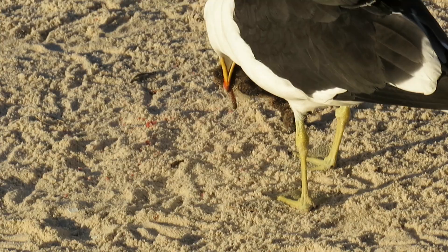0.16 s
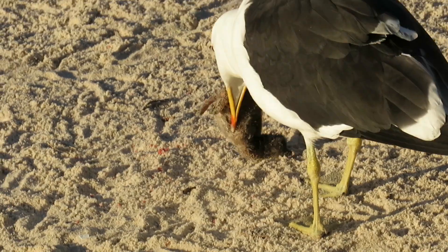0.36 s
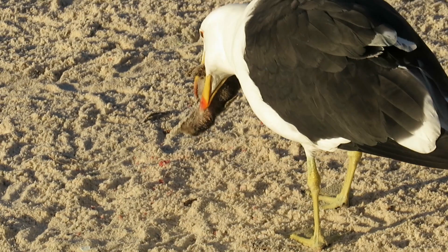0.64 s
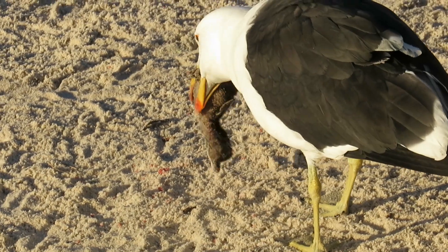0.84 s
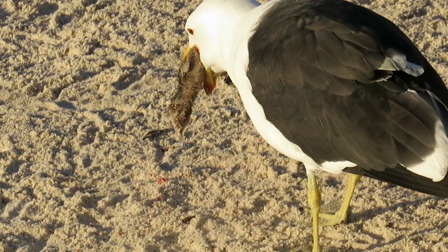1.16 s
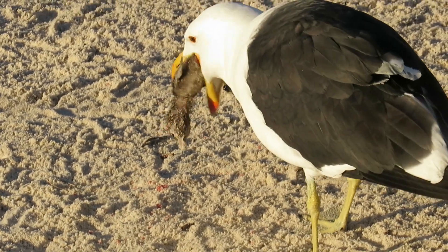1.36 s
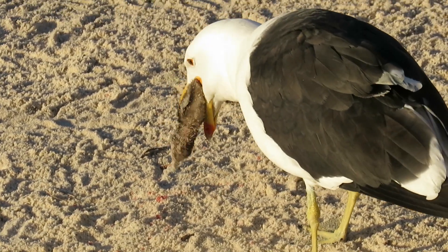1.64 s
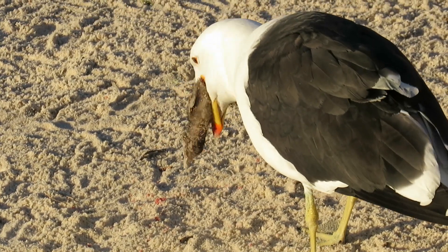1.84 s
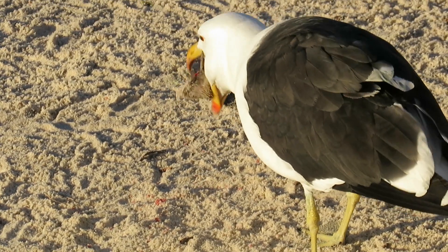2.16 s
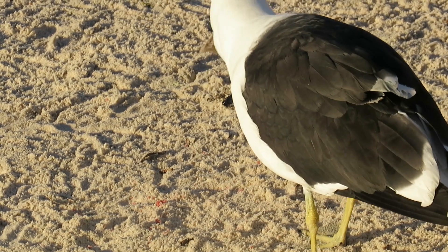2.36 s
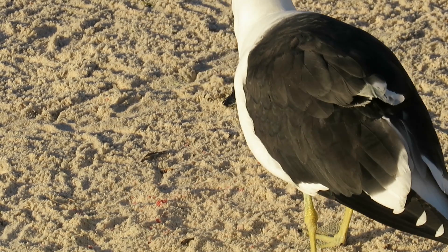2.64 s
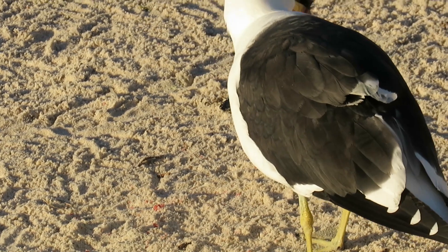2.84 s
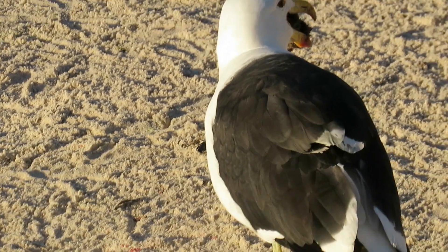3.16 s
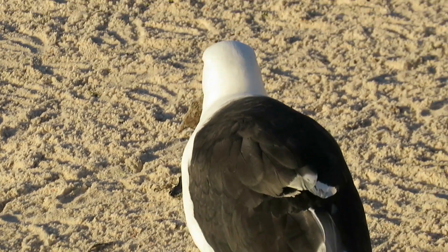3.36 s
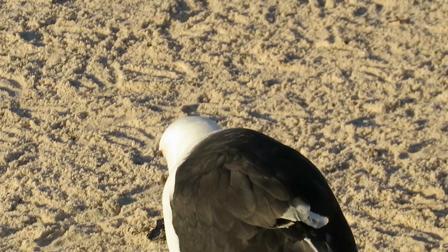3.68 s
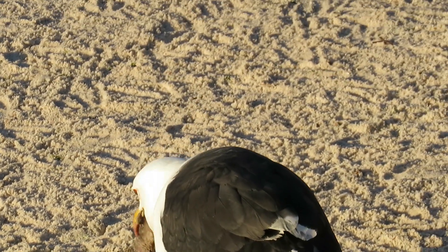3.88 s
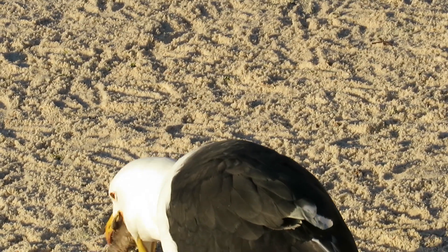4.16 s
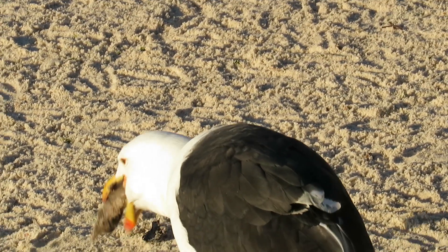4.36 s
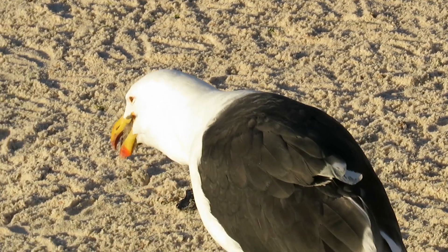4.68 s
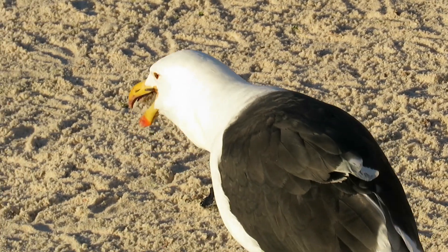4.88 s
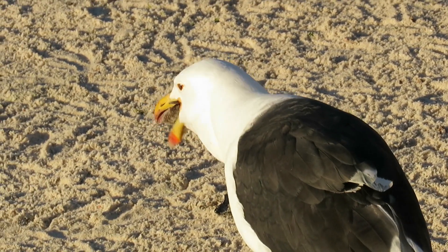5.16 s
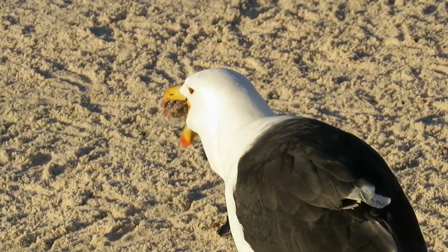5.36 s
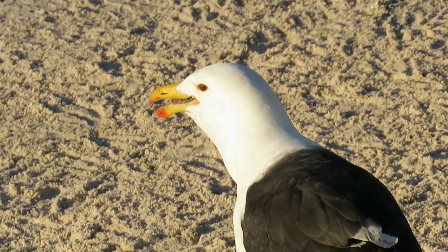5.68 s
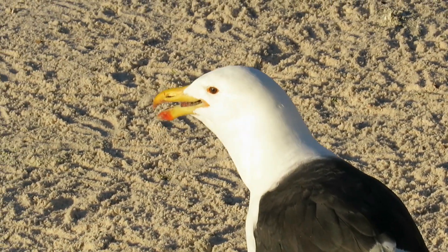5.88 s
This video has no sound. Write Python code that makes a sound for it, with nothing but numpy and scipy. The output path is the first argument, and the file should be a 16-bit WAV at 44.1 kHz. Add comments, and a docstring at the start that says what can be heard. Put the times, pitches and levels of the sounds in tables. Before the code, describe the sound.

A sandy beach heard in narrow stereo. Surf noise steps up abruptly at about 0.24 s, swells from 0.8 to 1.15 s, holds, and drains away after 2.2 s over a faint low hum. From 0.2 to 2.3 s a rattling penguin brays, rough and pulsing about 32 times a second, rising to a clearer, louder peak near 2.1 s. A lower penguin crosses it at 1.2-1.9 s with two calls settling into smooth notes. A faint tick and single high chirp come near 0.8 s; chirps resume at 2.4 s, roughly every 0.3 s. Second long brays overlap: low from 2.4 and 3.25 s, rattling from 2.75 to 4.4 s. Falling gull mews sound on the right at 2.65, 3.3 and 4.65 s, the latter two doubled. From 4.7 s to the end come short hoarse brays, with a soft low thud at 5.6 s.

```python
"""A sandy beach, heard at a camera's two closely spaced microphone ports.
A high, rattling penguin brays; the surf noise steps up abruptly, then swells and drains away over a faint hum.
A small bird gives one chirp, a low, smooth penguin brays across the first, and chirps resume at a steady pace.
Gulls, falling whistles with a strong octave, mew three times, and short brays close the scene.
Each bray is a tone chopped by an uneven rattle, with overtones coloured by the throat."""
import sys
import numpy as np
from scipy import signal
from scipy.fft import rfft, irfft, next_fast_len
from scipy.io import wavfile
from scipy.ndimage import uniform_filter1d, map_coordinates

SR = 44100
rng = np.random.default_rng(int(sys.argv[2]) if len(sys.argv) > 2 else 0)


def persist_wave(psi):
    """Save psi, clipped to +-1, as 16-bit WAV."""
    counts = np.round(np.clip(psi, -1, 1) * 32767).astype(np.int16)
    wavfile.write(sys.argv[1], SR, np.atleast_2d(counts).T)


N = 265482  # length [samples]

# Surf layers rumble, wash, spray, before their trims: (calm sea level [dB], gain at full strength [dB],
# held back before the step up [dB], power of the strength that the gain follows)
SURF_LAYERS = [(-49, 15.5, -0.1, 0.85), (-42.5, 14.5, 2, 0.78), (-53.5, 16, 12.5, 1.2)]
# Relative spectra of the three layers: (frequency [Hz], level per Hz [dB])
RUMBLE_SPECTRUM = [(20, -24), (55, -1), (110, 3.5), (180, 7), (500, -16.5), (1500, -72.5)]
WASH_SPECTRUM = [(100, -20), (230, 10.5), (520, -0.5), (800, 2), (1600, -10), (2400, -18.5), (4500, -55.5)]
SPRAY_SPECTRUM = [(600, -23.5), (1400, 6.5), (2200, 4), (2750, 0), (3600, -1.5), (7000, -14), (10000, -25),
                  (15000, -89)]
# Likeness of the surf at the two ports: (frequency [Hz], left-right likeness [0-1])
SURF_LIKENESS = [(300, 1), (1100, .96), (2300, .88), (7300, .69)]
# The surf's lean to the left: (frequency [Hz], left minus right [dB])
SURF_LEAN = [(370, 0.5), (2300, 4.2), (4300, 2.4), (14000, 0)]
# Relative spectrum of the camera's own noise: (frequency [Hz], level per Hz [dB])
HISS_SPECTRUM = [(3000, 8), (10000, 8.5), (13000, -5)]
# Soft low bumps: (time [s], half length [s], frequency [Hz], level [dB])
LOW_BUMPS = [(.218, .025, 105, -31), (5.635, .05, 55, -40)]
# Faint, brief peeps: (time [s], half length [s], frequency [Hz], level [dB])
FAINT_PEEPS = [(.068, .012, 1650, -41), (.135, .016, 1680, -41)]
# The small bird's chirps: (start [s], peak level [dB], lift of the opening flick [dB])
BIRD_CHIRPS = [(.775, -46, -4), (2.39, -44, -4), (2.706, -39, -8), (3.018, -38.5, 2), (3.64, -40, -1),
               (3.939, -42.5, 3), (4.245, -42, 5), (4.564, -42.5, 5), (4.87, -45, 4), (5.173, -46, 7),
               (5.48, -42.5, 4), (5.779, -46, 0)]
# Shape of one chirp: (time from its start [s], pitch [Hz], level against its peak [dB])
CHIRP_SHAPE = [(0, 6200, -30), (.009, 5650, -11), (.012, 5050, -13), (.018, 4720, -20), (.034, 4530, -4),
               (.052, 4350, 0), (.062, 4300, -8), (.08, 4450, -15)]
# Gull mews, one table each, some overlapping: (time [s], pitch [Hz], fundamental level [dB],
# octave level [dB], higher overtones' level before the beak's resonance [dB])
GULL_MEWS = [
    [(2.648, 1880, -62, -50, -70), (2.668, 1845, -47, -42, -64), (2.71, 1680, -38, -43, -58),
     (2.772, 1680, -38, -43, -58), (2.795, 1690, -50, -60, -70)],
    [(3.265, 1860, -52, -60, -70), (3.29, 1785, -39, -49, -60), (3.312, 1725, -39, -48, -51),
     (3.345, 1700, -37, -49, -47), (3.368, 1615, -37, -47, -51), (3.39, 1340, -41, -48, -50),
     (3.44, 1298, -47, -47, -52), (3.495, 1262, -53, -47, -57), (3.55, 1265, -60, -55, -68)],
    [(3.272, 1190, -62, -52, -60), (3.345, 1270, -58, -45, -51), (3.38, 1105, -58, -47, -46),
     (3.403, 1095, -60, -47, -45)],
    [(4.635, 1690, -50, -60, -68), (4.66, 1670, -38, -48, -57), (4.69, 1570, -39, -53, -62),
     (4.782, 1505, -37, -52, -58), (4.792, 1480, -52, -51, -65), (4.818, 1335, -47, -52, -68),
     (4.88, 1240, -52, -53, -66), (4.958, 1205, -49, -56, -70)],
    [(4.73, 1715, -58, -54, -60), (4.803, 1490, -40, -53, -63), (4.85, 1400, -55, -63, -70)],
]
# The rattling penguin's brays, levels before the attack: (start [s], peak [s], end [s], start pitch [Hz],
# peak pitch [Hz], end pitch [Hz], start level [dB], peak level [dB], roughness at the peak [0-1],
# roughness in the tail [0-1], power of the fall, overtone lift [dB])
HIGH_PENGUIN_BRAYS = [ (.2, 2.06, 2.345, 258, 308, 290, -32.7, -26.4, .56, .6, 7, 0.5),
                      (2.75, 4.2, 4.42, 268, 303, 245, -35.5, -27.2, .64, .16, 2.2, 1.5),
                      (4.725, 4.77, 4.87, 262, 278, 160, -32, -31, .7, .5, 1.8, -3),
                      (4.98, 5.09, 5.19, 248, 264, 257, -34, -30, .8, .6, 3, -3),
                      (5.18, 5.235, 5.3, 255, 275, 225, -26, -27.5, .45, .45, 1.2, -6),
                      (5.255, 5.72, 5.83, 278, 252, 195, -33.8, -30, .45, .35, 2.4, -2.5), ]
# The smooth penguin's brays, levels before attack and sag: (start [s], settles [s], end [s],
# rattle pitch [Hz], note pitch [Hz], rattle level [dB], note level [dB], sag time [s], share of pitch lost)
LOW_PENGUIN_BRAYS = [ (1.18, 1.26, 1.47, 252, 223, -29.5, -25.3, .01, .25),
                     (1.42, 1.67, 1.93, 236, 222, -27.5, -26, .04, .25),
                     (2.42, 2.81, 3.24, 238, 212, -33, -27, .027, .25),
                     (3.25, 4.23, 4.65, 232, 210.5, -37.5, -28.9, .033, .25),
                     (4.96, 5.01, 5.28, 212, 214, -33, -32.5, .11, .6),
                     (5.4, 5.85, 6.01, 215, 204, -43.5, -34, .07, .5), ]
# The throat's colour on overtones, before effort: (frequency [Hz], level against the fundamental [dB])
THROAT_COLOUR = [(500, -2.5), (610, -8), (740, -11), (920, -2.5), (1070, -10.5), (1550, -12.5), (2200, -30)]
# The hardest jolts in the rattle: (time [s])
JOLT_TIMES = [.298, .737, 1.81, 2.037, 2.143, 2.228, 2.31, 2.503, 3.55, 4.007, 4.04, 4.102, 4.133, 4.195,
              5.062, 5.203, 5.686, 5.742]
# Hoarse air in the short strokes: (time [s], half length [s], level [dB])
HOARSE_STROKES = [(4.769, 0.032, -40.5), (5.234, .034, -38.5), (5.675, 0.045, -39)]
# That air in the throat's resonances, relative: (frequency [Hz], level per Hz [dB])
HOARSE_SPECTRUM = [(300, -18), (680, -9), (800, 2.5), (910, 2), (1050, -14), (1450, -6), (2300, -17.5),
                   (9000, -66)]

STEP_UP_S = 0.237  # the surf noise steps up abruptly
BUILD_S, CREST_S, DRAIN_S, DRAIN_TIME_S = 0.76, 1.15, 2.172, 0.78  # it builds, holds and drains away
FIRST_STRENGTH, CREST_STRENGTH = 0.71, 0.97  # surf strength before it builds and at the crest [0-1]
RUMBLE_TRIM_DB, WASH_TRIM_DB, SPRAY_TRIM_DB = 1, 1.0, 4.0
SPLASH_S, SPLASH_HALF_S, SPLASH_DB = 1.095, .03, 4  # a brief burst of spray near the crest
FOAM_PATCHY_DB = .8  # the foam is dense and even
HUM_GROWS_S, HUM_GROWS_DB = 4.7, 6  # the hum is stronger late on
TICK_S, TICK_DB, TICK_DECAY_S, TICK_TOP_HZ = .753, -38, .002, 7000  # level before the low-pass
CRACK_S = .17  # a mew's added unsteadiness per glide speed [share of pitch a second]
BRAY_ATTACK_S, BRAY_ATTACK_DB = 0.027, 10  # every bray swells in from this far below
RATTLE_HZ, RATTLE_STRAY = 32.5, 1.0  # approximate beats a second; scale of their straying [radians]
JOLT_S, JOLT_DB = .012, 1.8  # half length of a jolt; its lift at full throb depth
WIND_UP_ROUGH, CLEARING_SHARE = 1.0, .2  # first roughness; share of the wind-up over which it clears
CRESCENDO_POWER = 1.7  # bend of the climb
# The drop just after the peak (in full for a clean tail) and the further loss by the end
LET_GO_S, LET_GO_DB, FALL_DB = .03, 6.3, 10
RATTLE_ROUGH, NOTE_ROUGH, SETTLE_S = 0.52, 0.039, 0.023  # roughness before and after settling; its speed
SAG_DB = 20.5  # level lost by the end of the low note
TOP_HZ = 15100  # the camera's band limit


def amp(db):
    """Decibels to gain."""
    return 10 ** (np.asarray(db) / 20)


def unit(x):
    """Scale to rms 1."""
    return x / np.sqrt(np.mean(x ** 2) + 1e-20)


def along(points, hz):
    """(Hz, value) points read on a log frequency axis."""
    f, v = np.transpose(points)
    return np.interp(np.log(hz + 1), np.log(f + 1), v)


def ramp(t, start, end):
    """0 before the start, 1 after the end, straight between."""
    return np.clip((t - start) / max(end - start, 1e-3), 0, 1)


def switch(t, s, width_s):
    """A smooth step from 0 to 1 around time s."""
    return .5 + .5 * np.tanh((t - s) / (2 * width_s))


def bump(t, s, half_s):
    """A bell-shaped swell to 1 at time s."""
    return np.exp(-((t - s) / half_s) ** 2)


def blend(a, b, share):
    """From a to b as the share goes from 0 to 1."""
    return a + (b - a) * share


def wobble(rate, size):
    """A smooth random curve, rate knots a second."""
    at = np.arange(size) * rate / SR
    return map_coordinates(rng.standard_normal(int(at[-1]) + 4), [at], mode="mirror")


def turns(hz):
    """Running phase [radians] of a changing frequency."""
    return 2 * np.pi * np.cumsum(hz) / SR


def add(track, s, sound):
    """Mix a sound into a track from time s."""
    part = track[max(round(s * SR), 0):][:len(sound)]
    part += sound[:len(part)]


def call_clock(start, end):
    """A call's sample times and its soft-edged gate."""
    t = np.arange(start, end, 1 / SR)
    return t, np.clip(np.minimum(t - start, end - t) / 0.0061, 0, 1)


def call_curves(rows):
    """A call's gate and its columns, sample by sample over its own length."""
    s, *columns = np.transpose(rows)
    t, gate = call_clock(s[0], s[-1])
    return [gate] + [np.interp(t, s, column) for column in columns]


def blips(rows, waver):
    """Short wavering tones that swell and fade; waver scales the stray as a share of the pitch."""
    t = np.arange(N) / SR
    sway = 1 + waver * wobble(110, N)
    tones = sum(amp(db) * bump(t, s, half_s) * np.sin(turns(hz * sway)) for s, half_s, hz, db in rows)
    return np.sqrt(2) * tones


def filtered(x, response):
    """x through a complex response of frequency."""
    m = next_fast_len(N + SR // 4)
    return irfft(rfft(x, m) * response(np.fft.rfftfreq(m, 1 / SR)), m)[..., :N]


def ports(x, left_db, lead_us):
    """A source to one side is louder and earlier at the nearer port; positive values lie left."""
    side = np.array([[.5], [-.5]])
    seconds = lead_us * 1e-6
    return filtered(x, lambda hz: amp(side * left_db(hz)) * np.exp(2j * np.pi * hz * side * seconds))


def beach(x, t60=0.68):
    """Rocks and dunes return a thin, short tail, as decaying noise after a 12 ms gap."""
    t = np.arange(SR // 2) / SR
    tail = rng.standard_normal((2, len(t))) * amp(-60 * t / t60) * (t > .012)
    return signal.fftconvolve(x, tail / np.linalg.norm(tail[0]), axes=1)[:, :N]


def drone(hz=54, db=-55):
    """A faint, fuzzy low hum lies under everything, with wandering phase and level."""
    level_db = db + HUM_GROWS_DB * switch(np.arange(N) / SR, HUM_GROWS_S, width_s=.1)
    tone = np.sin(turns(np.full(N, hz)) + 0.89 * wobble(9, N))
    return amp(level_db) * unit(tone * amp(2.6 * wobble(12, N)))


def surf_levels():
    """One strength curve drives all three layers [dB]; a splash lifts the spray briefly."""
    t = np.arange(N) / SR
    strength = blend(FIRST_STRENGTH, CREST_STRENGTH, ramp(t, BUILD_S, CREST_S))
    strength *= np.exp(-np.maximum(t - DRAIN_S, 0) / DRAIN_TIME_S)
    before_step = 1 - switch(t, STEP_UP_S, width_s=0.0012)
    levels = np.array([calm_db + crest_db * strength ** power - held_db * before_step
                       for calm_db, crest_db, held_db, power in SURF_LAYERS])
    levels[-1] += SPLASH_DB * bump(t, SPLASH_S, SPLASH_HALF_S)
    return levels


def rush(spectrum, patchy_db):
    """Stereo water noise of rms 1, with patches of random gain and less likeness in the treble."""
    z = signal.stft(rng.standard_normal((2, N)), nperseg=512)[2]
    field = uniform_filter1d(rng.standard_normal(z.shape[1:]), size=5, axis=0)  # across frequency
    field = uniform_filter1d(field, size=12, axis=1)  # across time
    pair = signal.istft(z * amp(patchy_db * unit(field)), nperseg=512)[1][:, :N]

    def colour_and_spread(hz):
        angle = np.arccos(np.clip(along(SURF_LIKENESS, hz), -1, 1)) / 2
        return amp(along(spectrum, hz)) * [np.cos(angle), np.sin(angle)]

    mid, side = filtered(pair, colour_and_spread)
    return unit(np.array([mid + side, mid - side]))


def surf():
    """The water's weight rumbles, its foam washes up the sand and its spray hisses, leaning left."""
    rumble_db, wash_db, spray_db = surf_levels()
    sea = amp(rumble_db + RUMBLE_TRIM_DB) * rush(RUMBLE_SPECTRUM, patchy_db=0.5)
    sea += amp(wash_db + WASH_TRIM_DB) * rush(WASH_SPECTRUM, FOAM_PATCHY_DB)
    sea += amp(spray_db + SPRAY_TRIM_DB) * rush(SPRAY_SPECTRUM, FOAM_PATCHY_DB)
    return ports(sea, lambda hz: along(SURF_LEAN, hz), lead_us=40.7)


def low_bumps():
    """Two soft low thuds, each a wavering tone that swells and fades."""
    return blips(LOW_BUMPS, waver=.2)


def tick():
    """One faint dry tick close by: a tiny burst of noise that dies at once."""
    track, t = np.zeros(N), np.arange(SR // 50) / SR
    add(track, TICK_S, amp(TICK_DB) * np.exp(-t / TICK_DECAY_S) * rng.standard_normal(len(t)))
    return signal.sosfilt(signal.butter(2, TICK_TOP_HZ, fs=SR, output="sos"), track)


def peeps():
    """Two faint peeps at the start, each a slightly wavering tone that swells and fades."""
    return blips(FAINT_PEEPS, waver=.025)


def small_bird():
    """The same down-slurred chirp off to the right: a gliding tone of varying flick and level."""
    track = np.zeros(N)
    gate, pitch, db = call_curves(CHIRP_SHAPE)
    size = len(gate)
    t = np.arange(size) / SR
    for s, peak_db, flick_db in BIRD_CHIRPS:
        shape = gate * amp(flick_db * (1 - ramp(t, .014, .02)))
        hz = pitch * (1 + 0.0037 * rng.standard_normal() + .013 * wobble(500, size))
        add(track, s, shape * amp(db + peak_db + 1.5 * wobble(160, size)) * np.sin(turns(hz)))
    return ports(track, lambda hz: -3, lead_us=-44.0)


def mew(rows, beak_hz=4600, width_hz=1500, step_db=1.5):
    """A falling whistle with a strong octave, rough where it cracks; the open beak rings above."""
    gate, pitch, first_db, octave_db, upper_db = call_curves(rows)
    size = len(gate)
    unsteady = 1 + CRACK_S * SR * np.abs(np.gradient(np.log(pitch)))
    hz = pitch * (1 + .006 * unsteady * wobble(200, size))
    phase = turns(hz)
    voice = amp(first_db) * np.sin(phase) + amp(octave_db) * np.sin(2 * phase)
    for k in range(3, 6):
        beak = 1 / (1 + (2 * (k * hz - beak_hz) / width_hz) ** 2)
        overtone_db = upper_db - step_db * (k - 3.5) + 2.5 * wobble(90, size)
        voice += beak * amp(overtone_db) * np.sin(k * phase)
    return np.sqrt(2) * gate * voice * amp(unsteady * wobble(140, size))


def gulls():
    """Mews from the right, each gliding down with its own shrillness."""
    track = np.zeros(N)
    for rows in GULL_MEWS:
        add(track, rows[0][0], mew(rows))
    return ports(track, lambda hz: -5, lead_us=-33)


def hoarse_air(flutter_db=4.5):
    """Fluttering noise: air rasps through the penguin's throat at the height of short strokes."""
    t = np.arange(N) / SR
    noise = filtered(rng.standard_normal(N), lambda hz: amp(along(HOARSE_SPECTRUM, hz)))
    air = unit(noise * amp(flutter_db * wobble(110, N)))
    return air * sum(amp(db) * bump(t, s, half_s) for s, half_s, db in HOARSE_STROKES)


def rattle(start, end):
    """The rattle's uneven beat [radians], which falls on every jolt, and the nearness of a jolt [0-1]."""
    t = np.arange(start, end, 1 / SR)
    marks = np.r_[0, JOLT_TIMES, N / SR]
    beats = np.cumsum(np.r_[0, np.round(np.diff(marks) * RATTLE_HZ)])  # whole beats between jolts
    jolt = bump(np.abs(t[:, None] - JOLT_TIMES).min(axis=1), 0, JOLT_S)
    stray = RATTLE_STRAY * (1 - jolt) * wobble(25, len(t))
    return 2 * np.pi * np.interp(t, marks, beats) + stray, jolt


def swell_in(t):
    """Level [dB] of a bray's attack."""
    return -BRAY_ATTACK_DB * np.exp(-(t - t[0]) / BRAY_ATTACK_S)


def low_gesture(start, settles, end, rattle_hz, note_hz, rattle_db, note_db, sag_s, sag_share):
    """Gate, pitch, level, roughness: a rattle settles to a clear note that sags as the air runs out."""
    t, gate = call_clock(start, end)
    held = switch(t, settles, SETTLE_S)
    sag = np.exp((t - end) / sag_s)
    pitch = blend(rattle_hz, note_hz, held) * (1 - sag_share * sag)
    db = blend(rattle_db, note_db, held) + swell_in(t) - SAG_DB * sag
    return gate, pitch, db, blend(RATTLE_ROUGH, NOTE_ROUGH, held)


def high_gesture(start, peak, end, start_hz, peak_hz, end_hz, start_db, peak_db,
                 peak_rough, tail_rough, fall_power):
    """Gate, pitch, level, roughness: the voice clears as it winds up to a peak of effort, then lets go."""
    t, gate = call_clock(start, end)
    climb = ramp(t, start, peak)
    effort = climb ** CRESCENDO_POWER
    fall = ramp(t, peak, end) ** fall_power
    let_go = ramp(t, peak, peak + LET_GO_S)
    pitch = blend(blend(start_hz, peak_hz, effort), end_hz, fall)
    clearing = np.exp((climb - 1) / CLEARING_SHARE)
    rough = blend(blend(WIND_UP_ROUGH, peak_rough, clearing), tail_rough, let_go)
    drop_db = LET_GO_DB * let_go * (1 - tail_rough) ** 2 + FALL_DB * fall
    db = blend(start_db, peak_db, effort) + swell_in(t) - drop_db
    return gate, pitch, db, rough


def bray(gate, pitch, db, rough, beat, jolt, throb_db, overtone_db):
    """A penguin's voice: rattle beats pulse level and pitch; higher, clearer notes are brighter."""
    size, rough = len(gate), np.clip(rough, 0, 1)
    shake = -.14 * np.sin(beat) + .06 * wobble(170, size)
    hz = pitch * (1 + rough ** 3 * shake + .004 * wobble(30, size))
    # a half-rough voice throbs most; at its roughest the pulses begin to run together
    depth = np.sin(2.2 * rough)
    throb = amp(depth * throb_db * (np.cos(beat) + .25 * wobble(110, size)))
    running_rms = np.sqrt(uniform_filter1d(throb ** 2, size=4096))
    throb *= amp(depth * JOLT_DB * jolt) / running_rms
    phase = turns(hz)
    rasp = unit(wobble(150, size) * np.sin(phase) + wobble(150, size) * np.cos(phase))
    rasp_share = .23 * rough ** 3 * (1 - jolt)
    voice = throb * (np.sqrt(2 * (1 - rasp_share)) * np.sin(phase) + np.sqrt(rasp_share) * rasp)
    # the throat's lowest resonance closes steeply above the fundamental
    voice = signal.sosfilt(signal.butter(N=6, Wn=385, fs=SR, output="sos"), voice)
    effort_db = overtone_db + 11 * np.log2(pitch / 300) - 7 * rough
    for k in range(2, 10):
        smear = rough ** 2 * wobble(120, size)
        overtone = np.sin(k * phase + rng.uniform(0, 2 * np.pi) + smear)
        voice += np.sqrt(throb) * amp(along(THROAT_COLOUR, k * hz) + effort_db) * overtone
    return gate * amp(db) * voice


def penguins():
    """Two birds bray across each other, a little to the right, their rattles nearly in step."""
    track = hoarse_air()
    for *row, overtone_db in HIGH_PENGUIN_BRAYS:
        beat, jolt = rattle(row[0], row[2])
        add(track, row[0], bray(*high_gesture(*row), beat, jolt, throb_db=5, overtone_db=overtone_db))
    for row in LOW_PENGUIN_BRAYS:
        beat, jolt = rattle(row[0], row[2])
        add(track, row[0], bray(*low_gesture(*row), beat, jolt, throb_db=6, overtone_db=-10.0))
    return ports(track, lambda hz: along([(330, -0.25), (900, -3.3)], hz), lead_us=-20)


def scene():
    """Birds over the sea; only the gulls, small bird and peeps feed the beach's tail."""
    background = drone() + surf() + low_bumps() + tick()
    calls = peeps() + small_bird() + gulls()
    return background + calls + amp(-13.0) * beach(calls) + penguins()


def record(dry, hiss_db=-71):
    """The camera adds a faint hiss and keeps nothing above its band limit."""
    hiss = filtered(rng.standard_normal((2, N)), lambda hz: amp(hiss_db + along(HISS_SPECTRUM, hz)))
    return filtered(dry + hiss, lambda hz: hz < TOP_HZ)


dry = scene()
out = record(dry)
persist_wave(out)
```